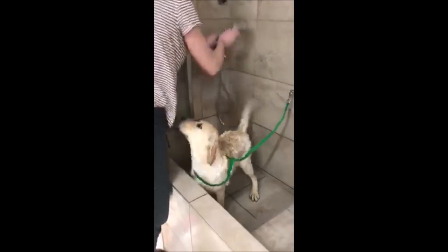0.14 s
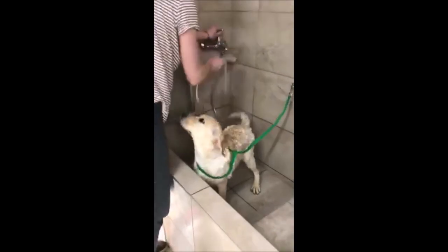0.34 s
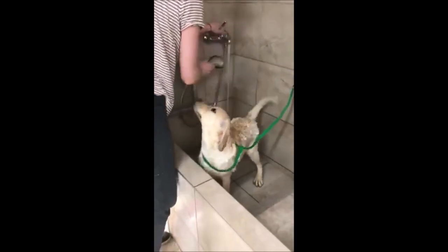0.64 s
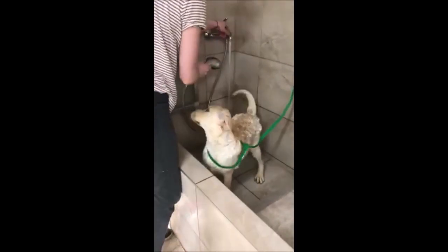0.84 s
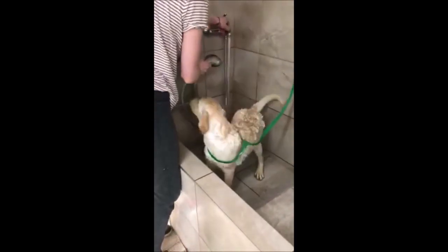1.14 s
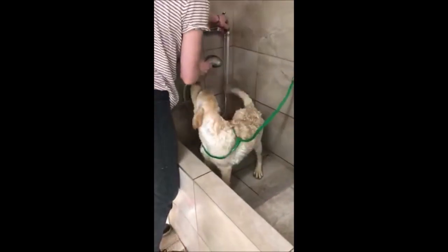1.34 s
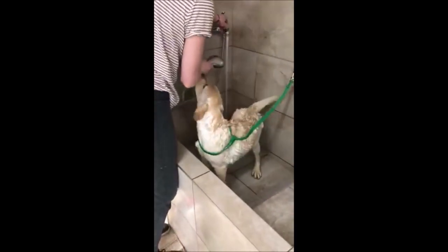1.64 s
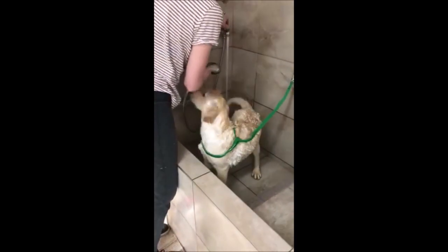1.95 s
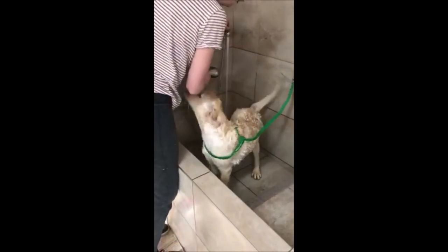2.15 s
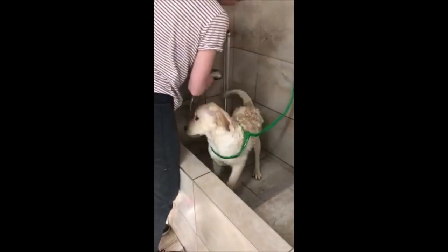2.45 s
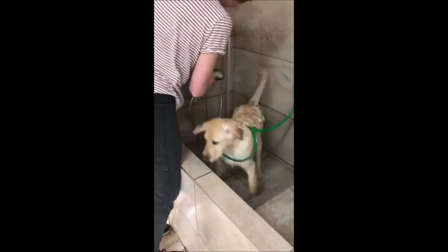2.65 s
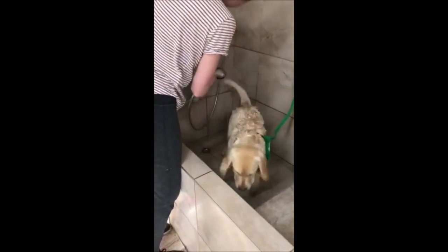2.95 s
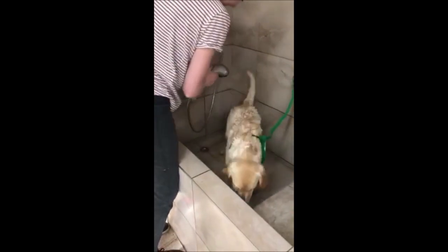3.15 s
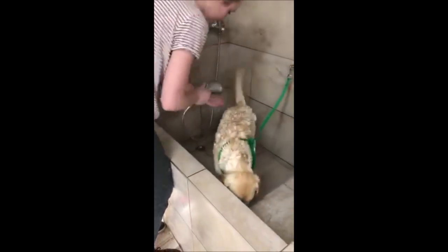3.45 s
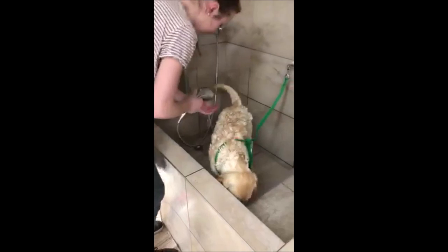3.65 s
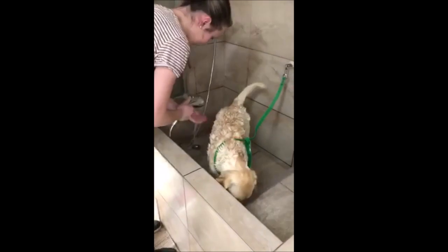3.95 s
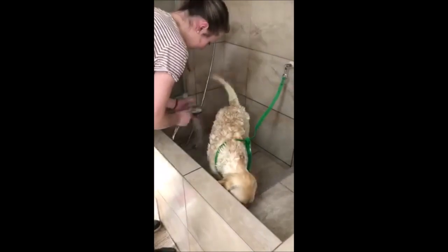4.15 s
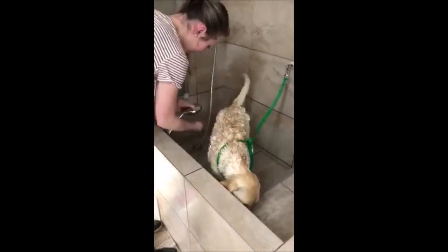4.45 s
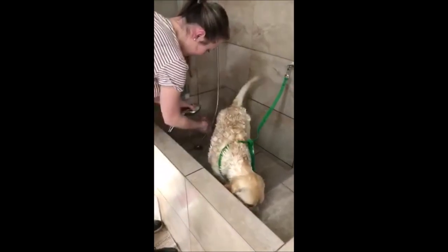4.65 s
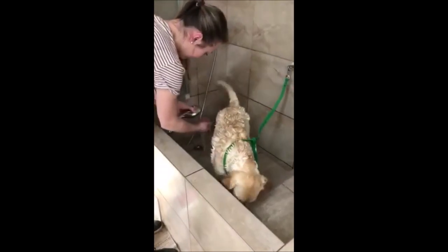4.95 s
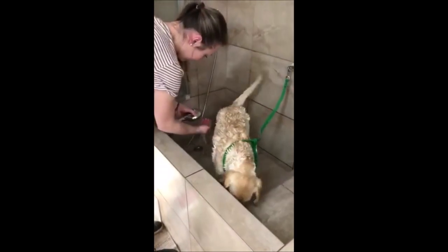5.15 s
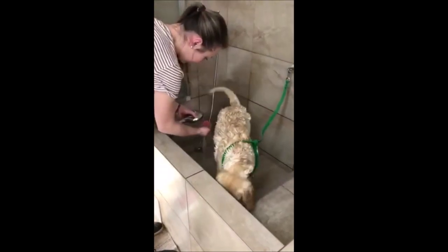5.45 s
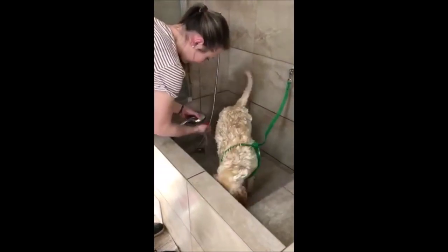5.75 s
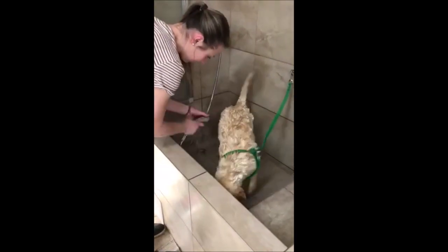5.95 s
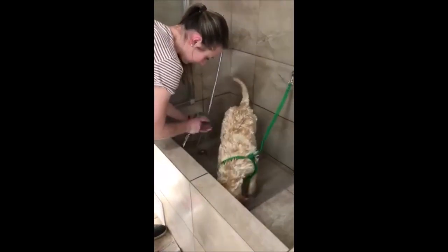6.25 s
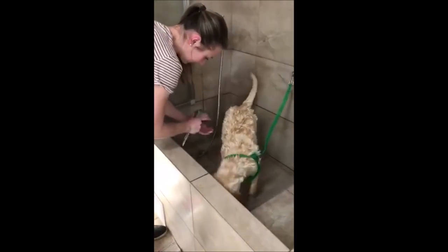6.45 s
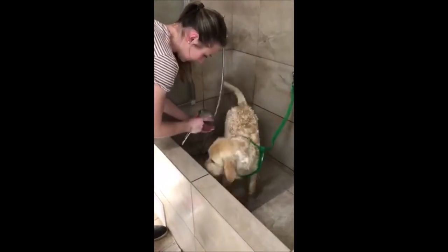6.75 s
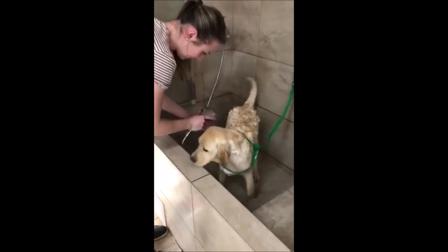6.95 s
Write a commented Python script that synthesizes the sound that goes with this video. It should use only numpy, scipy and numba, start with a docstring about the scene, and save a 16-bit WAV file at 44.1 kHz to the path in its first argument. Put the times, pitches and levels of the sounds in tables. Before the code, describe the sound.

A weak dribble of water in a small tiled stall, then a hard metallic tap clack and a sudden rush of strong, even spray on the floor. After about two and a half seconds come dull bumps as a dog turns; the spray drops to a softer, fluctuating splash over hand and coat, with plinks, slaps and hollow gurgles. Close microphone, short bright reflections, low rumble.

```python
"""Water dribbles, the tap clacks over and a hand shower sprays hard on the tiles of a stall, then more softly
over a hand and the wet coat of a dog. Drops tick and plink, bubbles gurgle, lumps of water slap, a cupped hand
sounds hollow, and dull bumps come as the dog turns; the small hard stall rings and a low rumble lies beneath.
Spray and splash are filtered random impacts, bubbles are damped sines rising in pitch, hollows are gliding
resonators, knocks and bumps are decaying noise and sines, the stall is a train of random reflections."""
import sys
import numpy as np
from scipy import signal
from scipy.fft import rfft, irfft
from scipy.io import wavfile
from numba import njit

SR = 44100
rng = np.random.default_rng(int(sys.argv[2]) if len(sys.argv) > 2 else 0)


def wrap_up_sound(samples):
    """Save the sound to the file named by the first command line argument, as 16-bit audio."""
    columns = np.atleast_2d(samples).T
    # keep every value between -1 and 1, then stretch to whole-number steps
    tamed = np.clip(columns, -1, 1)
    steps = np.round(tamed * 32767).astype(np.int16)
    wavfile.write(sys.argv[1], SR, steps)


N = 312669
T = np.arange(N) / SR
TAP_S = .5445
FULL_DB = -34  # flow of the wide-open spray on the tiles


def amp(db):
    """Decibels to gain."""
    return 10 ** (np.asarray(db) / 20)


def unit(x):
    """Scale to rms 1."""
    return x / np.sqrt(np.mean(x ** 2) + 1e-18)


def curves(rows):
    """Each column of a (time, ..) table, sample by sample."""
    time_s, *columns = np.transpose(rows)
    return [np.interp(T, time_s, column) for column in columns]


def add(track, start_s, sound):
    """Mix a sound into the track at a time."""
    i = max(int(start_s * SR), 0)
    track[i:i + len(sound)] += sound[:max(N - i, 0)]


def noise(count):
    """White noise."""
    return rng.standard_normal(count)


def colour(x, points, modes=(), size=8192):
    """Minimum-phase filter with a (Hz, dB) response and optional narrow peaks or dips."""
    hz = np.arange(size // 2 + 1) * SR / size + 1  # +1 avoids log(0)
    point_hz, point_db = np.transpose(points)
    db = np.interp(np.log(hz), np.log(point_hz), point_db)
    for centre_hz, width_hz, peak_db in modes:
        db = db + peak_db / (1 + (2 * (hz - centre_hz) / width_hz) ** 2)
    # folding the cepstrum makes the filter causal
    cepstrum = irfft(np.log(amp(db)))
    cepstrum[1:size // 2] *= 2
    cepstrum[size // 2 + 1:] = 0
    response = irfft(np.exp(rfft(cepstrum)))
    return signal.fftconvolve(x, response)[:len(x)]


def walk(rate_hz):
    """Random wandering of rms 1, with straight lines between random knots."""
    knots = noise(4096)
    return unit(np.interp(T * rate_hz, np.arange(len(knots)), knots))


def sizes(count, spread_db):
    """Drop sizes: many small, a few large, none beyond a limit."""
    return amp(spread_db * np.minimum(rng.exponential(size=count), 6))


def drops(rate_hz, spread_db, count=N):
    """Random impacts of either sign at a mean rate."""
    hits = rng.random(count) < rate_hz / SR
    return hits * sizes(count, spread_db) * rng.choice([-1, 1], count)


@njit
def ring(out, start_s, hz, cycles, size, glide):
    """Damped sines that swell over one cycle and rise in pitch as they die, mixed over a copy of out."""
    y = out.copy()
    for k in range(len(start_s)):
        n = int(cycles[k] / hz[k] * SR)
        phase, first = 0., int(start_s[k] * SR)
        for i in range(min(n, len(y) - first)):
            phase += 2 * np.pi * hz[k] * (1 + glide * i / n) / SR
            swell = min(phase / (2 * np.pi), 1.)
            y[first + i] += size[k] * swell * np.exp(-5. * i / n) * np.sin(phase)
    return y


@njit
def resonator(x, hz, q):
    """State-variable band-pass whose centre may move every sample."""
    y, band, low = np.empty(len(x)), 0., 0.
    for i in range(len(x)):
        g = np.tan(np.pi * hz[i] / SR)
        v = (band + g * (x[i] - low)) / (1 + g * (g + 1 / q))
        band, low, y[i] = 2 * v - band, low + 2 * g * v, v / q
    return y


def bubbles(low_hz, high_hz, cycles, spread_db, glide, count):
    """A cloud of small ringing air pockets at random times, the lower ones weaker; rms 1."""
    when, pitch, life = rng.random((count, 3)).T
    hz = low_hz * (high_hz / low_hz) ** pitch
    size = sizes(count, spread_db) * np.sqrt(hz)
    return unit(ring(np.zeros(N), when * N / SR, hz, cycles * (.5 + life), size, glide))


def following(flow_db, full_db, follow):
    """Level of a layer that gains follow dB per dB of flow, from full_db at full flow."""
    return full_db + follow * (flow_db - FULL_DB)


# rumble filter: (frequency [Hz], gain [dB])
RUMBLE_FILTER = [(20, -22), (33, -12.5), (42, -7), (49, 5), (60, -15), (85, -12.5), (120, -15.5),
                 (180, -18), (500, -25), (2000, -24.5), (9000, -63)]


def rumble():
    """Low steady rumble of the building: filtered noise."""
    return unit(colour(noise(N), RUMBLE_FILTER)) * amp(-56.0)


# dull bumps as the dog turns: (time [s], level [dB], boom pitch [Hz], fading time [s])
BUMP_EVENTS = [(2.257, -45.5, 228, 0.026), (2.707, -31, 650, 0.022), (2.743, -40, 370, 0.014),
               (2.761, -37, 252, 0.036), (2.795, -41.5, 664, 0.061), (2.828, -43, 266, 0.028)]
# bump filter: (frequency [Hz], gain [dB])
BUMP_FILTER = [(40, -9), (100, -2), (160, -3.5), (250, -1), (420, -3.5), (780, -6), (1000, -10),
               (2500, -26)]
BOOM_WIDTH, BOOM_DB = 0.45, 12.5  # width as a share of pitch, height


def bumps():
    """Soft, heavy contacts boom, each around its own pitch: decaying low noise."""
    out, t = np.zeros(N), T[:SR // 2]
    for start_s, db, hz, fade_s in BUMP_EVENTS:
        boom = unit(colour(noise(len(t)), BUMP_FILTER, [(hz, BOOM_WIDTH * hz, BOOM_DB)]))
        add(out, start_s, amp(db) * boom * np.exp(-t / fade_s))
    return out


# filter of a sharp tick: (frequency [Hz], gain [dB])
TICK_FILTER = [(500, -22), (1700, -6), (4000, -11), (6500, -1), (9000, 2)]
TICK_S, TICK_DB, TICK_FADE_S = 5.6255, -23, .0036


def tick():
    """One hard drop cracks on the tile close by: a very short burst of bright noise."""
    out, t = np.zeros(N), T[:SR // 20]
    crack = unit(colour(noise(len(t)), TICK_FILTER))
    add(out, TICK_S, amp(TICK_DB) * crack * np.exp(-t / TICK_FADE_S))
    return out


# drips into the water on the floor: (time [s], level [dB])
DRIP_LEVEL = [(0, -66), (.5, -62), (.8, -52), (3, -51), (3.7, -50), (4.8, -57), (5.3, -52), (5.9, -49),
              (6.3, -51), (7.08, -49)]


def drips():
    """Water running off hand and coat plinks into the puddle: small ringing bubbles."""
    db, = curves(DRIP_LEVEL)
    return bubbles(1600, 6500, cycles=60, spread_db=1.8, glide=.06, count=650) * amp(db)


# single short rings: bubbles, hard drops and the first slap of a bump:
# (time [s], level [dB], starting pitch [Hz], length [cycles])
SHORT_RINGS = [(2.709, -19, 1800, 10), (3.921, -13, 1930, 9.8), (3.924, -21, 1420, 7.1),
               (4.049, -16, 3900, 7), (4.8944, -15.5, 1900, 3.8), (4.897, -32, 1150, 6.2),
               (5.297, -31, 1244, 60), (5.625, -33, 1720, 26), (5.903, -40, 1780, 45),
               (5.942, -34, 1800, 54), (6.032, -26, 1250, 43), (6.039, -22.5, 1560, 30),
               (6.757, -28, 2750, 8.6), (6.846, -21, 5300, 14)]


def short_rings():
    """Bubbles, hard drops and the first slap of a bump: single damped sines, rising slightly in pitch."""
    start_s, db, hz, cycles = np.array(SHORT_RINGS, float).T.copy()
    return ring(np.zeros(N), start_s, hz, cycles, amp(db), 0.024)


# jet passing a hollow, such as the cupped hand:
# (start [s], length [s], first pitch [Hz], last pitch [Hz], starting level [dB], Q of each filter pass)
HOLLOW_PASSES = [(-.04, 0.055, 1180, 1250, -50, 3.9), (0.231, 0.19, 665, 790, -59, 3),
                 (0.248, 0.42, 318, 337, -61.5, .6), (3.103, 0.054, 900, 816, -46.5, 1.5),
                 (3.2, 0.11, 1310, 1050, -43.5, 0.51), (3.594, 0.11, 1840, 2320, -45.5, 0.67),
                 (3.93, .05, 1950, 1860, -49, 1.9), (4.073, .26, 440, 400, -62, 3.4),
                 (4.564, 0.023, 2120, 1970, -46.5, 1.9), (4.622, 0.048, 464, 432, -51.5, 3.2),
                 (4.699, 0.093, 920, 815, -54.5, 0.73), (5.201, 0.18, 1440, 1245, -48, 2.5),
                 (5.385, 0.23, 1280, 1230, -48, 1.6), (5.663, 0.14, 1550, 1700, -51.5, 1.5),
                 (5.681, 0.09, 317, 320, -59.5, 5), (6.109, 0.54, 1430, 1630, -54, 1.2),
                 (6.606, 0.078, 526, 465, -56, 1.4), (6.688, .37, 1460, 1450, -51, 2.7),
                 (6.966, 0.063, 1590, 1360, -47, 2.8)]
HOLLOW_ATTACK_S, HOLLOW_RELEASE_S, HOLLOW_SAG_DB_PER_S = 0.0063, 0.11, 3


def hollows():
    """The jet stirs a pocket of air: it swells, glides as the hollow changes shape, dies as the jet moves on."""
    out, stir, wobble = 0, drops(rate_hz=1400, spread_db=1.5), amp(0.49 * walk(45))
    for start_s, length_s, first_hz, last_hz, db, q in HOLLOW_PASSES:
        hz = np.interp(T, [start_s, start_s + length_s], [first_hz, last_hz]) * wobble
        age_s = np.maximum(T - start_s, 0)
        swell = np.minimum(age_s / HOLLOW_ATTACK_S, 1)
        release = np.exp(-np.maximum(age_s - length_s, 0) / HOLLOW_RELEASE_S)
        air = resonator(resonator(stir, hz, float(q)), hz, float(q))
        out = out + unit(air) * swell * release * amp(db - HOLLOW_SAG_DB_PER_S * age_s)
    return out


# limit over the hollow's level, pitch scatter either way
GURGLE_RATE_HZ, GURGLE_DB, GURGLE_OCTAVES, GURGLE_CYCLES = 70, 8, .14, 30


def gurgles(count=64):
    """Air torn off in each hollow rings as single bubbles near the hollow's pitch."""
    grains = []
    for start_s, length_s, first_hz, last_hz, db, q in HOLLOW_PASSES:
        gap, pitch, size, life = rng.random((count, 4)).T
        age_s = np.cumsum(-np.log(1 - gap)) / GURGLE_RATE_HZ
        hz = np.interp(age_s, [0, length_s], [first_hz, last_hz])
        hz = hz * 2 ** (GURGLE_OCTAVES * (2 * pitch - 1))
        cycles = GURGLE_CYCLES * (.5 + life)
        rows = np.array([np.maximum(start_s + age_s, 0), hz, cycles, amp(db + GURGLE_DB) * size])
        grains.append(rows[:, age_s < length_s])
    return ring(np.zeros(N), *np.ascontiguousarray(np.hstack(grains)), .06)


# rate, level at full flow, dB gained per dB of flow, scatter either way, fading time
LUMP_RATE_HZ, LUMP_DB, LUMP_FOLLOW, LUMP_SCATTER_DB, LUMP_FADE_S = 13, -32, .4, 3.5, 0.0068


def small_lumps(flow_db):
    """Rows for slaps(): small lumps at random times and pitches, stronger with the flow."""
    when, pitch, size = rng.random((int(LUMP_RATE_HZ * N / SR), 3)).T
    db = following(flow_db[(when * N).astype(int)], LUMP_DB, LUMP_FOLLOW)
    db = db + LUMP_SCATTER_DB * (2 * size - 1)
    hz = 2000 * 3 ** pitch
    return [(start_s, level, f, 0, LUMP_FADE_S) for start_s, level, f in zip(when * N / SR, db, hz)]


# loudest lumps of water hitting the floor:
# (time [s], level [dB], trapped air pitch [Hz], spatter relative to that ring [dB], fading time [s])
BIG_LUMPS = [(.7697, -23.5, 5260, -25, 0.012), (1.222, -21, 4220, 11, 0.0037),
             (1.5394, -25, 6000, 3, 0.017), (1.5734, -26, 3500, -8, 0.017), (1.601, -24.5, 3600, 6, 0.016),
             (3.1953, -31.5, 5540, 1, 0.1), (3.5882, -35, 4200, 0, 0.0046), (3.763, -23, 2440, 5, 0.0066),
             (3.8689, -31, 5890, -9, 0.0067), (3.9205, -23, 2270, -2, 0.0082),
             (3.936, -25, 4500, 5, 0.0076), (4.039, -26.5, 4180, 13, 0.011), (4.0466, -21.5, 3750, 6, 0.01),
             (4.073, -23.5, 5160, 16, 0.004), (4.1507, -28, 2750, -15, 0.0055),
             (4.1776, -25, 5220, 19, 0.0082), (4.194, -19, 5370, -17, 0.0026),
             (4.333, -32, 2760, -7, 0.0087), (4.3966, -27.5, 4600, -18, 0.0056),
             (4.464, -27.5, 5400, -13, 0.0053), (4.6422, -26.5, 1820, 4, 0.0083),
             (4.892, -29.5, 2200, 2, 0.005), (4.9372, -28, 2140, -2, 0.0081),
             (5.4796, -23, 1180, 12, 0.005), (5.513, -29.5, 3900, -1, 0.0075),
             (5.6652, -25, 5370, -3, 0.0064), (5.7201, -23, 4700, -3, 0.0054),
             (5.744, -28.5, 5140, -14, 0.01), (5.8077, -30, 5200, -5, 0.0078),
             (5.8997, -26, 3950, 5, 0.0082), (5.9713, -28.5, 2300, 11, 0.023),
             (6.014, -17, 4640, 1, 0.0062), (6.0315, -18.5, 1530, 4.5, 0.0072),
             (6.1205, -25.5, 4300, 0, 0.0084), (6.208, -31.5, 4400, -1, 0.012),
             (6.3661, -29.5, 3400, -14, 0.0063), (6.571, -23.5, 5840, 1, 0.0062),
             (6.7338, -29.5, 4390, -3, 0.0077), (6.7535, -14.5, 2900, -3, 0.0037),
             (6.8443, -18, 5800, -10, 0.0036), (6.9398, -30.5, 2130, 3, 0.012),
             (6.9955, -28.5, 4450, -2, 0.018)]
# spatter filter, also the crack of the tap: (frequency [Hz], gain [dB])
SPATTER_FILTER = [(200, -27.5), (700, -8.5), (1400, -2), (2600, 2.5), (5500, 1), (7000, -2.5), (9500, -5)]


def slaps(rows):
    """Each lump of water stirs a pocket of air and throws a quick spatter of drops."""
    out, t = np.zeros(N), T[:SR // 8]
    landing = 1 - np.exp(-t / .004)
    for start_s, db, hz, spatter_db, fade_s in rows:
        impacts = drops(rate_hz=9000, spread_db=0.0, count=len(t))
        spatter = unit(colour(impacts, SPATTER_FILTER, size=1024))
        pocket = unit(resonator(noise(len(t)), np.full(len(t), float(hz)), 5.6))
        mix = (pocket + amp(spatter_db) * spatter) / np.hypot(1, amp(spatter_db))
        add(out, start_s, amp(db) * landing * np.exp(-t / fade_s) * mix)
    return out


# valve knocking at its stop and rebounding: (time [s], level before the high-pass [dB])
KNOCKS = [(.5445, -8.5), (.5497, -20), (.5562, -18), (.569, -23)]
# ring of the tap and its pipe: (frequency [Hz], relative level [dB], t60 [s])
TAP_RING = [(175, -25, .12), (290, -23, .14), (480, -18, .12), (740, -14, .09), (1000, -14, .06),
            (1300, -9, .05), (1720, -6, .06), (2240, -3, .13), (3000, -8, .06), (4170, -1, .14),
            (5240, -10, .06), (5770, -9, .08)]


def tap():
    """The valve snaps over: a hard knock with rebounds, a sharp crack, and the metal rings briefly."""
    out, t = np.zeros(N), T[:SR // 3]
    knock = np.sin(2 * np.pi * 2000 * t) * (t / .0004) * np.exp(1 - t / .0004)
    for start_s, db in KNOCKS:
        add(out, start_s, amp(db) * knock)
    crack = colour(noise(len(t)), SPATTER_FILTER) * np.exp(-t / .011)
    add(out, TAP_S, amp(-14.5) * crack)
    # the small valve radiates little bass
    out = signal.sosfilt(signal.butter(2, 550, "high", fs=SR, output="sos"), out)
    metal = sum(amp(db - 60 * t / t60_s) * np.sin(2 * np.pi * hz * t) for hz, db, t60_s in TAP_RING)
    add(out, TAP_S, amp(-25) * metal)
    return out


# floor patter filter: (frequency [Hz], gain [dB])
DRUM_FILTER = [(60, -7.5), (160, -6), (280, 3), (420, -6), (560, 0), (720, 4), (900, -0.5), (1400, -1),
               (4000, -42.5)]
DRUM_DB, DRUM_FOLLOW = -55.5, 0.47


def drumming(flow_db):
    """The floor answers the drops with a dull patter that swells as the jet wanders."""
    db = following(flow_db, DRUM_DB, DRUM_FOLLOW) + 1.93 * walk(6.3)
    return unit(colour(drops(rate_hz=1500, spread_db=3.5), DRUM_FILTER)) * amp(db)


# splash filter: (frequency [Hz], gain [dB])
SPLASH_FILTER = [(300, -32.5), (700, -16.5), (1100, -9.5), (1700, -4.5), (2250, 1.5), (2900, -4.5),
                 (4000, -5.5), (9000, -25.5)]
SPLASH_DB, SPLASH_FOLLOW = -47.5, 0.68
SURGE_DB, SURGE_S = 17, 0.072  # first rush out of the opened valve: extra level, fading time


def puddle(flow_db):
    """Heavier drops splash into standing water and trap larger bubbles, most of all in the first rush."""
    surge_db = SURGE_DB * (T > TAP_S) * np.exp(-abs(T - TAP_S) / SURGE_S)
    splash_db = following(flow_db, SPLASH_DB, SPLASH_FOLLOW) + surge_db + 2.03 * walk(22)
    plinks = bubbles(900, 3600, cycles=18, spread_db=2.8, glide=.08, count=5000)
    splats = unit(drops(rate_hz=2700, spread_db=3.0))
    return unit(colour(splats + amp(-1.0) * plinks, SPLASH_FILTER)) * amp(splash_db)


# coarse spray and fine mist filters: (frequency [Hz], gain [dB])
SPRAY_FILTER = [(300, -34), (1200, -23), (2500, -9.5), (3400, 0.5), (4300, 1.5), (6200, 2), (7000, 0.5),
                (9500, -5)]
MIST_FILTER = [(2000, -49), (5500, -20), (6800, 13.5), (8700, 13.5), (9500, -2)]
# narrow peaks and dips that colour both: (frequency [Hz], width [Hz], gain [dB])
SPRAY_PEAKS = [(3585, 80, 3), (4097, 35, 3.5), (4221, 40, 4), (4620, 60, 2), (4823, 35, 3), (5000, 170, -4),
               (6002, 60, 4), (6277, 120, 2), (6930, 90, -3), (7700, 300, -2), (8166, 60, 3)]
MIST_DB, MIST_FOLLOW = -41.5, 0.99
CLUMP_DB, CLUMP_GROWTH = 1.3, .08  # spread at full flow, dB more per dB less flow


def spray(spray_db):
    """Jets break into drops that tick on the wet tiles in clumps and leave a fizz of tiny bubbles."""
    # a full spray is even, a weaker one breaks up
    clumps = amp((CLUMP_DB + CLUMP_GROWTH * (FULL_DB - spray_db)) * walk(30))
    ticks = unit(drops(rate_hz=4600, spread_db=0.5)) * clumps
    fizz = bubbles(2400, 9200, cycles=50, spread_db=3.3, glide=.04, count=6000) * clumps
    impacts = unit(ticks + amp(-9.5) * fizz)
    coarse = unit(colour(impacts, SPRAY_FILTER, SPRAY_PEAKS)) * amp(spray_db)
    droplets = unit(drops(rate_hz=7300, spread_db=1.0)) * clumps
    fine = unit(colour(droplets + amp(-3.0) * fizz, MIST_FILTER, SPRAY_PEAKS))
    mist_db = following(spray_db, MIST_DB, MIST_FOLLOW) + 0.27 * walk(4.6)
    return coarse + fine * amp(mist_db)


MIRROR_HOP_S, MIRROR_GAIN = .06, .36  # time between reflection patterns, strength of each reflection


def swirl(x, count=4):
    """The landing spot hops between floor and walls: its first reflections keep changing and the hiss warbles."""
    hop = int(MIRROR_HOP_S * SR)
    out, padded = x.copy(), np.pad(x, (0, 2 * hop))
    fade = np.sqrt(np.hanning(2 * hop))
    for i in range(0, N, hop):
        piece = fade * padded[i:i + 2 * hop]
        for lag_ms in rng.uniform(1, 6, count):
            add(out, i / SR + lag_ms / 1000, MIRROR_GAIN * rng.choice([-1, 1]) * piece)
    return out / np.sqrt(1 + count * MIRROR_GAIN ** 2)


def reflections(wet_db):
    """Direct sound, then tile reflections from 1.5 ms on that grow denser as they decay; unit energy."""
    t, t60_s = T[:SR // 3], .21
    echoes = noise(len(t)) * (rng.random(len(t)) < .03 + t / .06) * (t > .0015)
    echoes = echoes * amp(-60 * t / t60_s)
    response = amp(wet_db) * echoes / np.linalg.norm(echoes)
    response[0] = 1
    return response / np.linalg.norm(response)


def stall(x, wet_db, count=14):
    """Crossfaded reflection patterns: they change gradually as jet, arm and dog move about."""
    out, step_s = np.zeros(N), T[-1] / (count - 1)
    for k in range(count):
        share = np.sqrt(np.maximum(1 - abs(T / step_s - k), 0))
        now = share > 0
        add(out, T[now][0], signal.fftconvolve((x * share)[now], reflections(wet_db)))
    return out


# flow as the shower head is lifted, opened up and aimed at tiles, hand and coat: (time [s], level [dB])
FLOW_LEVEL = [(0, -54), (.18, -67.5), (.24, -53), (.36, -46), (.47, -52), (.538, -54), (.55, -34.5),
              (1.3, -34), (2.5, -33), (2.95, -31), (3.1, -39.5), (3.5, -41), (3.85, -46), (4.12, -44.5),
              (4.23, -35.5), (4.36, -40.5), (4.5, -47.5), (4.56, -54), (4.59, -48), (4.76, -56),
              (4.95, -44.5), (5.13, -49.5), (5.4, -40.5), (5.6, -49), (5.76, -43.5), (5.87, -45),
              (6.05, -41), (6.22, -47), (6.3, -47), (6.65, -42.5), (6.9, -43), (7.08, -48)]


def scene():
    """All the water and knocks inside the stall, over the rumble."""
    flow_db, = curves(FLOW_LEVEL)
    jet = swirl(spray(flow_db) + puddle(flow_db))
    stream = jet + drumming(flow_db) + hollows() + gurgles() + drips()
    hits = slaps(BIG_LUMPS) + slaps(small_lumps(flow_db)) + short_rings() + tick()
    inside = stall(stream + hits + bumps(), wet_db=-1.0)
    clack = signal.fftconvolve(tap(), reflections(wet_db=-3.5))[:N]
    return (inside + clack + rumble())[None]


TOP_HZ = 9150


def record(dry):
    """Steep elliptic low-pass: the treble stops abruptly above TOP_HZ."""
    return signal.sosfilt(signal.ellip(12, .2, 75, TOP_HZ, fs=SR, output="sos"), dry)


dry = scene()
out = record(dry)
wrap_up_sound(out)
```